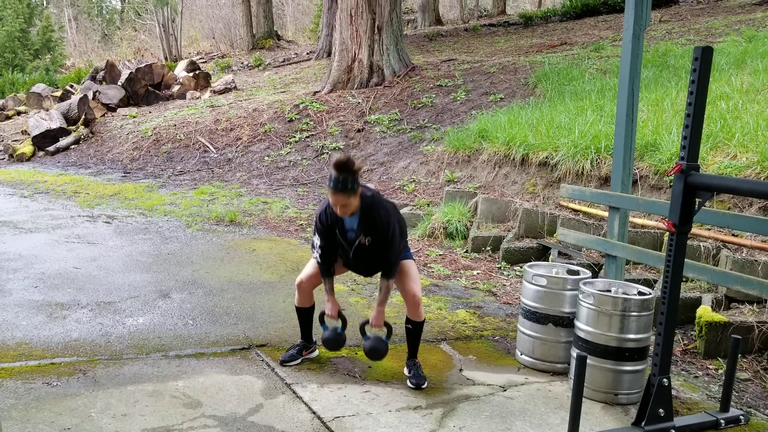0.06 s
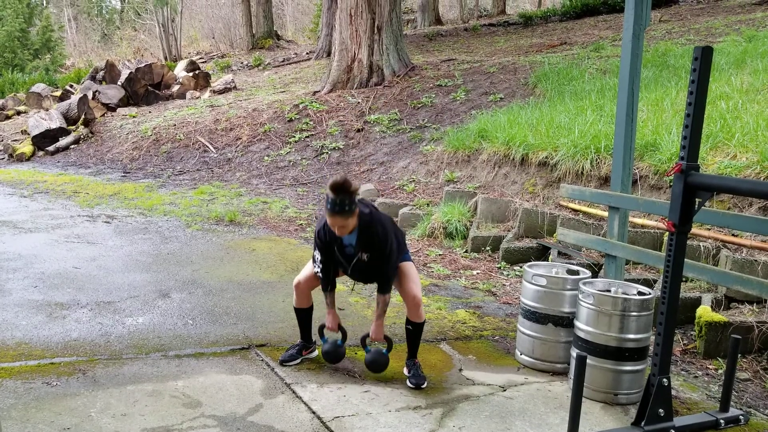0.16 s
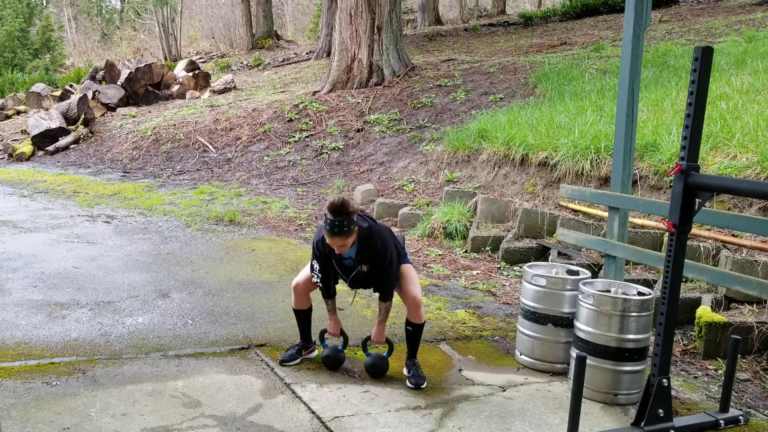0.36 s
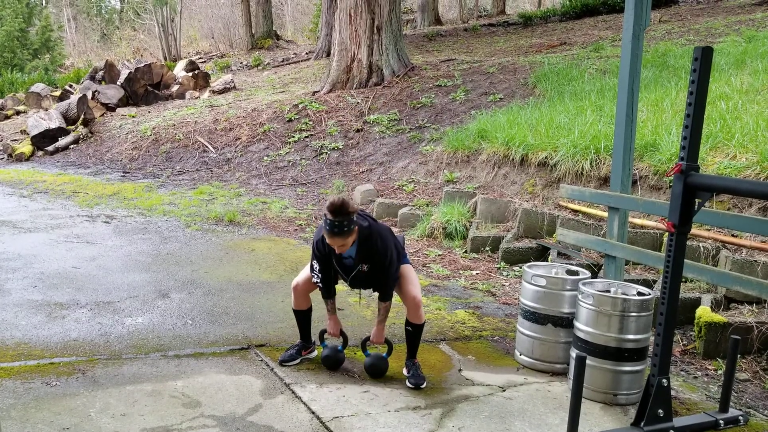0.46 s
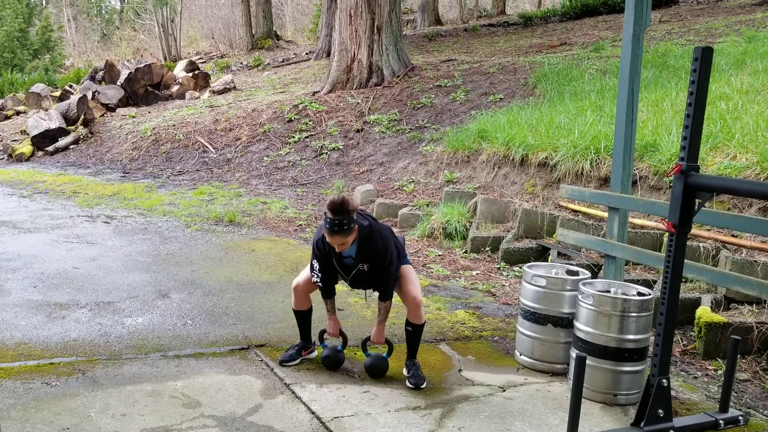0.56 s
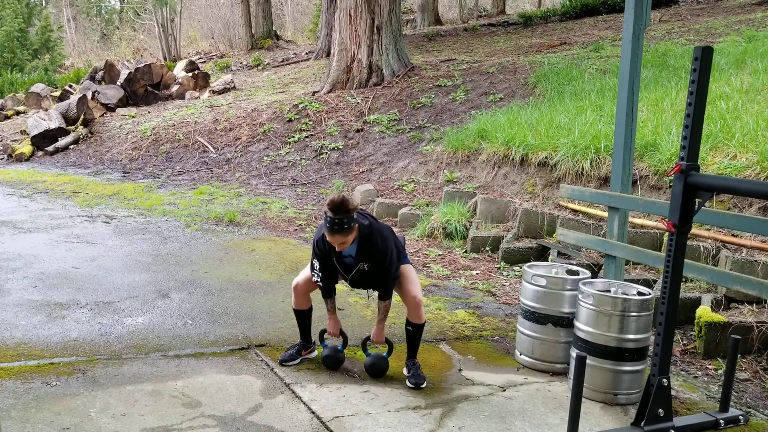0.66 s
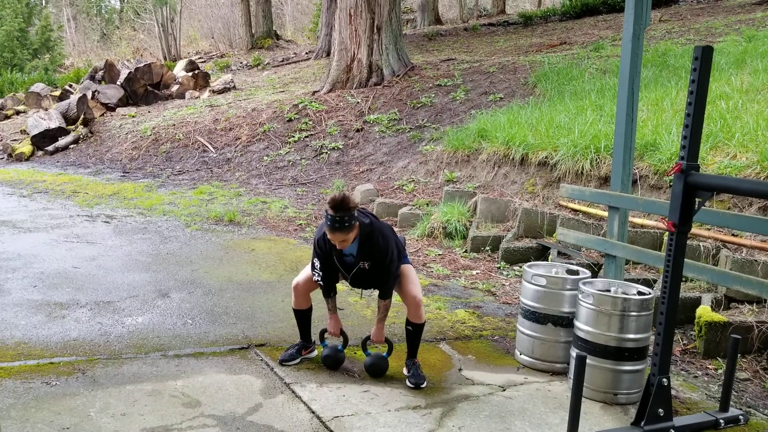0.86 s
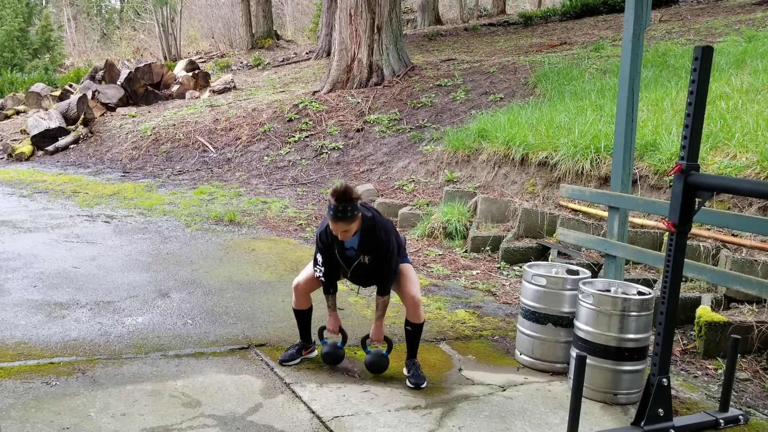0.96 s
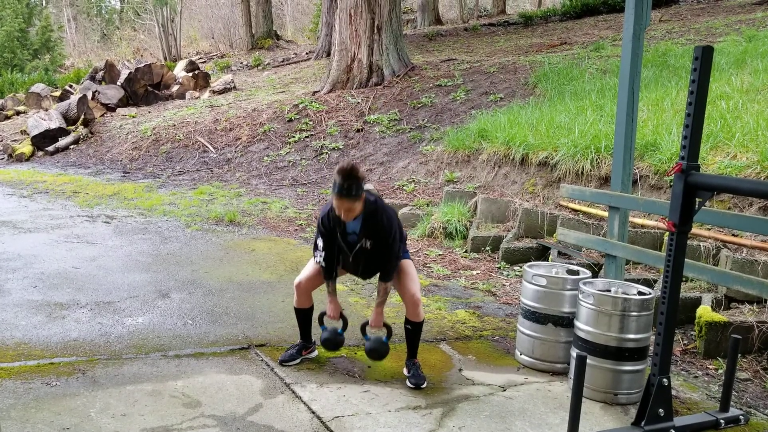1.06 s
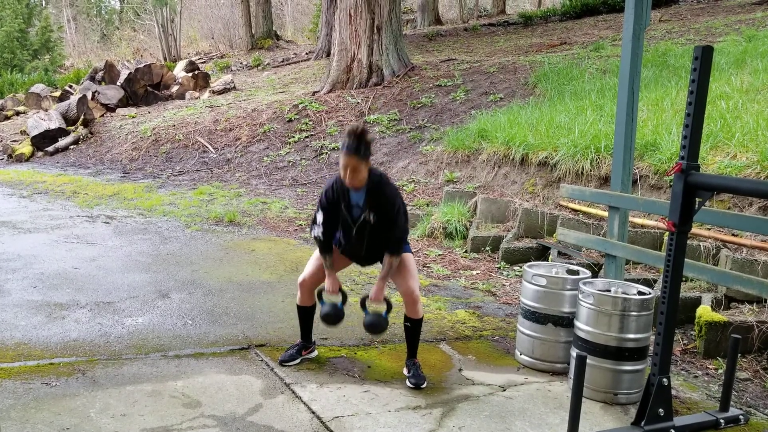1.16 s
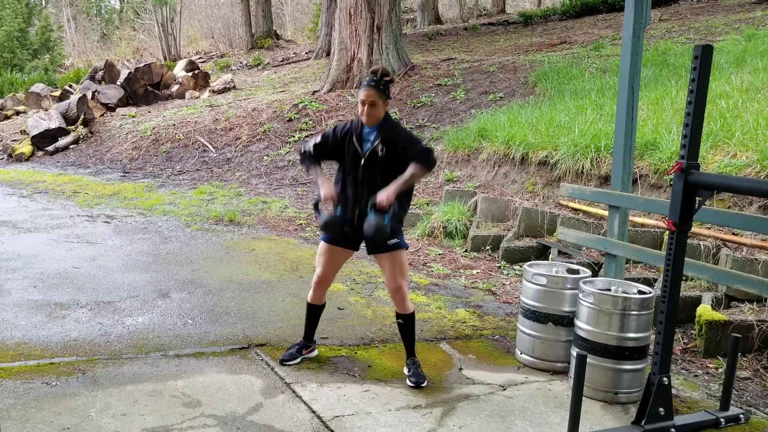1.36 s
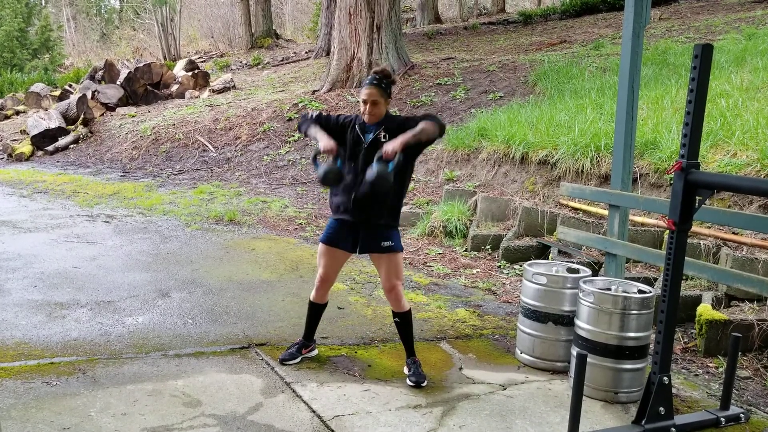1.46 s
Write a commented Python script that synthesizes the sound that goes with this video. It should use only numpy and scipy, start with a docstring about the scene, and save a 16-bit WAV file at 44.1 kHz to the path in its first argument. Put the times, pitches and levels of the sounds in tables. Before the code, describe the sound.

Two iron kettlebells thud onto wet concrete at about 0.25 seconds, one just after the other, following a faint cloth rustle. They chatter briefly and ring low, with crackling grit and a short echo. Cloth rustles faintly again near 0.9 seconds, a small knock comes at 1.1 as they lift, and a short dry scuff at 1.4. A low outdoor rumble and faint hiss continue throughout.

```python
"""Cloth rustles faintly as two iron kettlebells come down on wet concrete. At 0.24 s they land, one just
after the other, and chatter briefly as they settle. The dull thuds ring low, grit crackles under them and
the yard echoes; a limiter holds down the peaks. Near 0.9 s the cloth rustles again, then comes a small
knock as the weights leave the ground and, at 1.4 s, a short dry scuff as they rise.
A low outdoor rumble and a faint hiss go on throughout."""
import sys
import numpy as np
from scipy import signal
from scipy.fft import rfft, irfft
from scipy.io import wavfile
from scipy.ndimage import uniform_filter1d, minimum_filter1d

SR = 44100
rng = np.random.default_rng(int(sys.argv[2]) if len(sys.argv) > 2 else 0)


def generate_wav(sig):
    """Save sig (samples, or channels by samples) to the path in sys.argv[1] as 16-bit PCM at SR."""
    pcm = np.round(np.clip(np.atleast_2d(sig).T, -1, 1) * 32767).astype(np.int16)
    wavfile.write(sys.argv[1], SR, pcm)


N = 66150
T = np.arange(N) / SR
SIZE = 2 * N  # filters get extra room so that echoes do not wrap round to the start
FREQS = np.arange(N + 1) * SR / SIZE

# the two landings: t/s, relative level/dB, treble cutoff/Hz (lower is softer), relative grit level/dB
LANDINGS = [(0.2387, 2, 626, 3), (0.2528, -12.5, 1052, -1.5)]
# how much louder the weights are on the left: f/Hz, left over right/dB
WEIGHTS_LEAN = [(80, 7), (700, 6.6), (1200, 9.2), (2400, 2.7), (5000, 4)]


def kettlebells(echo):
    """Every contact thumps; the first landing makes the slab ring, the harder second one the iron."""
    # tone colour of one thud: f/Hz, gain/dB
    thud_colour = [(25, -60), (42, -44), (62, -1), (140, -3.5), (290, 7), (450, 3.5), (750, 4), (870, -4.5),
                   (1080, -1.5), (1350, -12), (2400, 0), (4000, -30.5), (9000, -17.5)]
    # low tones of the slab under the load: f/Hz, relative level/dB, time to fade by 60 dB/s
    slab_tones = [(66.2, 6.5, 0.17), (89.6, 13.5, 0.12), (148, -2.5, 0.26), (192.4, -8.5, 0.31),
                  (278.3, 3.5, 0.2), (361, -9, 0.53), (379, 2, 0.24), (446, -6, 0.31), (518.8, -4, 0.27),
                  (562.6, -9.5, 0.43)]
    # higher tones of the iron: f/Hz, relative level/dB, time to fade by 60 dB/s
    iron_tones = [(700, -13, .22), (730, -12, .22), (992, -17, .3), (1047, -12, .23), (2366, -31, .3),
                  (3133, -45, .25)]
    force = sum(push(at, db, hz) for at, db, hz, _ in contacts())
    thuds = -undb(21.5) * shape(force, causal(curve(thud_colour)))
    slab = ring(LANDINGS[0][0], slab_tones, rise_s=0.01)
    iron = ring(LANDINGS[1][0], iron_tones, rise_s=0.0013)
    return shape(shape(thuds, echo) + slab + iron, sides(curve(WEIGHTS_LEAN)))


def contacts(count=4):
    """List the landings, then the ever weaker knocks as the weights settle, in the same columns."""
    start_s, gap_s, fall_db, cutoff_hz = 0.2652, 0.011, 5, 1000
    chatter = [(start_s + k * gap_s, -5.5 - k * fall_db, cutoff_hz, -5 - k * fall_db)
               for k in range(count)]
    return list(LANDINGS) + chatter


def push(at, db, cutoff_hz):
    """One contact is a short, smooth push: the softer it is, the duller it sounds."""
    spike = np.zeros(N)
    spike[int(at * SR)] = undb(db)
    return signal.sosfilt(signal.butter(5, cutoff_hz, fs=SR, output="sos"), spike)


def ring(at, tones, rise_s):
    """Pure tones swell while a weight beds down, then die away."""
    age = np.maximum(T - at, 0)
    ringing = sum(undb(db - 20) * np.sin(2 * np.pi * hz * age) * fade(at, t60) for hz, db, t60 in tones)
    return ringing * (1 - np.exp(-age / rise_s))


def grit(echo):
    """Wet grit, crushed under the weights, crackles at every contact and ticks at each landing."""
    # tone colour of the grit: f/Hz, gain/dB
    colour = [(900, 5.5), (2000, 11.5), (3200, 1.5), (4000, -6.5), (6800, -3.5), (7700, -24), (9300, -12),
              (11000, -3.5), (15500, -5.5)]
    crackle = sum(undb(db) * fade(at, t60=0.073) for at, _, _, db in contacts())
    ticks = sum(undb(db + 13.5) * fade(at + 0.00096, t60=0.008) for at, _, _, db in LANDINGS)
    crunch = noise(colour) * (crackle + ticks) * undb(-51 + 3 * wobble(rate_hz=500))
    return shape(crunch, echo) * sides(left_db=3.5)


def lift_off(echo):
    """The weights tap the slab lightly as they leave it, with less echo than the landings."""
    # the taps: t/s, relative level/dB, treble cutoff/Hz
    knocks = [(1.0862, -46, 2000), (1.0888, -39.5, 2000)]
    # tone colour of one tap: f/Hz, gain/dB
    colour = [(60, -13), (200, -6), (380, -2), (700, -3), (1000, -18), (1350, -9), (2200, -12.5),
              (4000, -25)]
    force = sum(push(*knock) for knock in knocks)
    taps = undb(23) * shape(force, causal(curve(colour)))
    weaker_echo = 1 + undb(-3) * (echo - 1)  # the 1 is the direct sound, which stays as it is
    return shape(taps, weaker_echo * sides(curve(WEIGHTS_LEAN)))


def scuff():
    """A dry, grainy rub starts suddenly during the lift and fades."""
    # tone colour of the rub: f/Hz, gain/dB
    colour = [(500, -11), (1000, -7.5), (1400, -5.5), (1750, 0), (2100, 0.5), (2550, -7.5), (3300, -5),
              (4400, -10), (6000, -17), (8200, -30), (11000, -25), (15500, -32)]
    rub = noise(colour) * fade(1.4125, t60=0.49)
    return rub * undb(-54.5 + 1.6 * wobble(rate_hz=500)) * sides(left_db=3.5)


def rustle():
    """Cloth hisses and flaps faintly on the way down, and again as the lift begins."""
    # tone colour of the cloth's hiss: f/Hz, gain/dB
    hiss_colour = [(1000, -13), (3500, -8), (4800, -1), (5700, 2), (6600, -12), (7800, -26), (11000, -11),
                   (15500, -9)]
    # tone colour of its low flap: f/Hz, gain/dB
    flap_colour = [(120, -9.5), (250, -4), (600, 0.5), (1000, -4), (1800, -25), (4000, -40)]
    # when the cloth moves: start/s, end/s, hiss level/dB, flap level/dB
    moves = [(-0.1, 0.3, -70.5, -66), (0.87, 1.01, -75, -96)]
    hiss, flap = noise(hiss_colour), noise(flap_colour)
    cloth, fade_s = 0, 0.029
    for start, end, hiss_db, flap_db in moves:
        swell = np.clip(np.minimum(T - start, end - T) / fade_s, 0, 1)
        cloth += swell * (undb(hiss_db) * hiss + undb(flap_db) * flap)
    return cloth * undb(wobble(rate_hz=25)) * sides(left_db=10.5)


def yard():
    """The yard's answer to a click: the click itself, quick echoes off near surfaces, a longer tail."""
    # pitch bands of the echo's tail: f/Hz, relative level/dB, time to fade by 60 dB/s
    bands = [(60, -16, .16), (150, -0.5, 0.48), (350, 2.5, 0.41), (682, -2, 0.51), (1400, 8, 0.36),
             (3030, 10, .35), (12000, -1.5, 0.67)]
    centres_hz = np.array(bands)[:, 0]
    white = noise([(20, 0), (20000, 0)])
    tail, build_s = 0, 0.012
    for k, (_, db, t60) in enumerate(bands):
        only_this_band = curve(np.c_[centres_hz, np.arange(len(bands)) == k])
        tail += shape(white, only_this_band) * undb(db) * fade(0, t60)
    tail *= 1 - np.exp(-T / build_s)
    early = noise([(60, -13), (300, 9.5), (16000, 1.5)]) * fade(0.002, t60=0.066)
    slap = undb(-5.5) * (np.arange(N) == int(0.0058 * SR))  # one clear bounce off a near surface
    return (T == 0) + slap + undb(-4.5) * unit_energy(tail) + undb(-3) * unit_energy(early)


def outdoors():
    """A steady, low, distant rumble with a faint hiss."""
    # tone colour of the background: f/Hz, gain/dB
    colour = [(20, -29.5), (35, -13), (60, -1.5), (88, 2), (130, -5.5), (215, -24), (350, -25),
              (480, -35.5), (580, -32.5), (800, -38.5), (1150, -42.5), (1400, -35), (2400, -48.5),
              (3000, -40), (3600, -52), (4500, -44), (6200, -55.5), (7600, -66.5), (9200, -63),
              (11000, -49), (15500, -55)]
    # how much louder it is on the left: f/Hz, left over right/dB
    lean = [(60, 7), (250, 8), (700, 15), (2000, 9.5), (4500, 17.5), (6800, -4), (10000, 12.5),
            (15000, 2.5)]
    return shape(noise(colour), sides(curve(lean))) * undb(-45)


def noise(colour):
    """Stereo noise with a typical size of 1, coloured by (f/Hz, gain/dB) points."""
    # left and right match in the bass: f/Hz, likeness (0 or less is unrelated, 1 or more is the same)
    likeness = [(100, 4.2), (350, 1.95), (1000, -0.32), (2200, -0.33), (6000, -0.58)]
    alike = np.clip(curve(likeness), 0, 1)
    mid, side = rng.standard_normal((2, N))
    gain = undb(curve(colour))
    mid = shape(mid, gain * np.sqrt(1 + alike))
    side = shape(side, gain * np.sqrt(1 - alike))
    stereo = np.array([mid + side, mid - side])
    return stereo / stereo.std()


def wobble(rate_hz):
    """A smooth random wiggle with a typical size of 1."""
    width = max(int(SR / rate_hz), 1)
    wiggle = rng.standard_normal(N)
    for _ in range(2):
        wiggle = uniform_filter1d(wiggle, width, mode="wrap")
    return wiggle / wiggle.std()


def fade(start, t60):
    """A sudden start, then a fall of 60 dB every t60 seconds."""
    return (T >= start) * undb(-60 * np.maximum(T - start, 0) / t60)


def undb(db):
    """Turn decibels into a gain, a number to multiply by."""
    return 10 ** (np.asarray(db) / 20)


def curve(points):
    """Join (f/Hz, value) points with straight lines along a pitch scale."""
    hz, values = np.array(points, float).T
    return np.interp(np.log(np.maximum(FREQS, 1)), np.log(hz), values)


def shape(sound, gain):
    """Filter a sound with one gain for each frequency."""
    return irfft(rfft(sound, SIZE) * gain, SIZE)[..., :N]


def causal(db):
    """A filter with this tone colour that never sounds before the hit."""
    cepstrum = irfft(np.log(undb(db)), SIZE)  # the colour, laid out along time
    cepstrum[1:N] *= 2  # fold the half before the hit onto the half after it
    cepstrum[N + 1:] = 0
    return np.exp(rfft(cepstrum))


def sides(left_db):
    """Left and right gains that make the left louder by left_db."""
    gains = undb(np.array([[1], [-1]]) * left_db / 2)
    return gains / gains.mean(axis=0)


def unit_energy(stereo):
    """Scale a sound so that its two sides have an average energy of 1."""
    return stereo / np.sqrt(np.sum(stereo ** 2) / 2)


def scene():
    """Add up the weights in the echoing yard, the cloth, the scuff and the background."""
    echo = rfft(yard(), SIZE)
    return kettlebells(echo) + grit(echo) + lift_off(echo) + rustle() + scuff() + outdoors()


def record(dry):
    """A limiter briefly turns down the loudest peaks, then the highest treble is cut."""
    limit, hold_samples, top_hz = 0.46, int(0.006 * SR), 15850
    gain = limit / np.maximum(np.abs(dry).max(axis=0), limit)
    gain = uniform_filter1d(minimum_filter1d(gain, hold_samples), hold_samples)  # hold, then smooth
    treble_cut = signal.ellip(10, 0.2, 80, top_hz, fs=SR, output="sos")
    return signal.sosfilt(treble_cut, dry * gain)


dry = scene()
out = record(dry)
generate_wav(out)
```